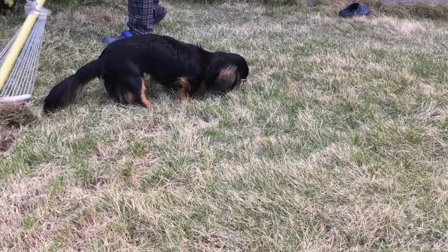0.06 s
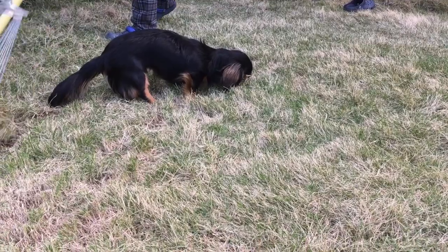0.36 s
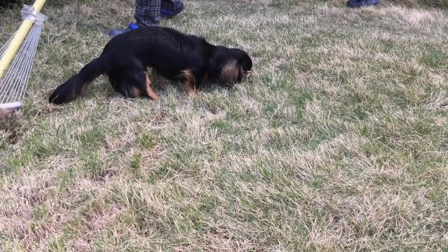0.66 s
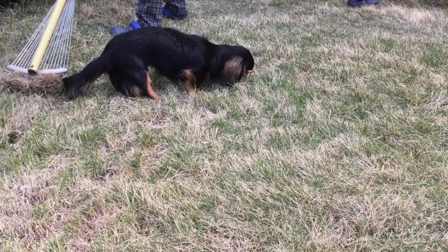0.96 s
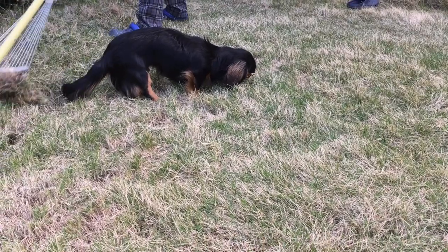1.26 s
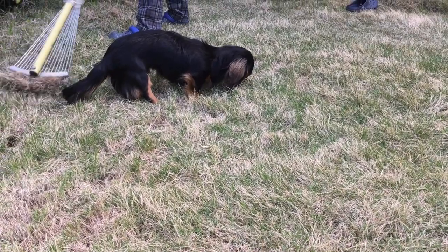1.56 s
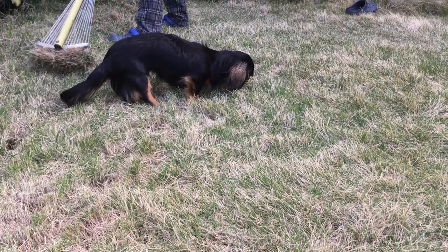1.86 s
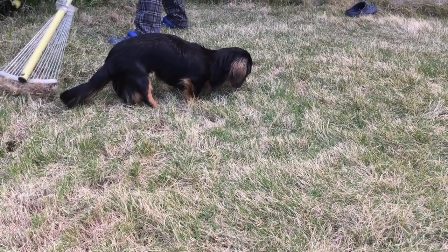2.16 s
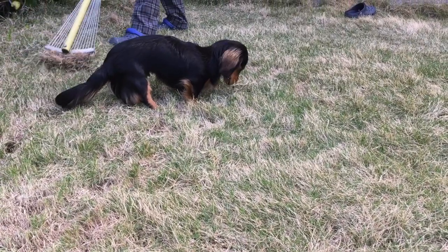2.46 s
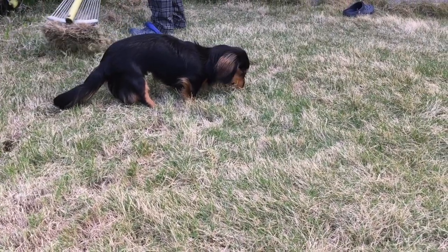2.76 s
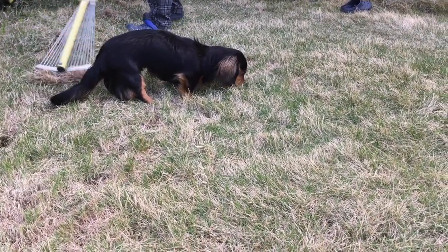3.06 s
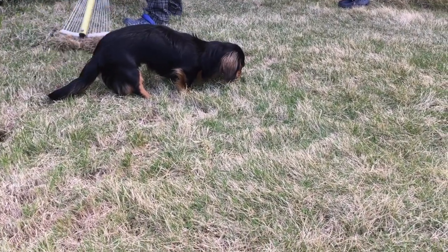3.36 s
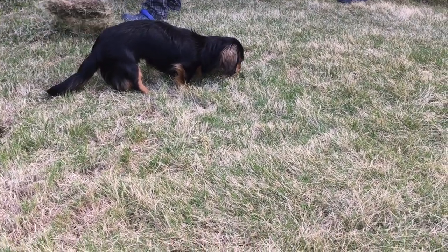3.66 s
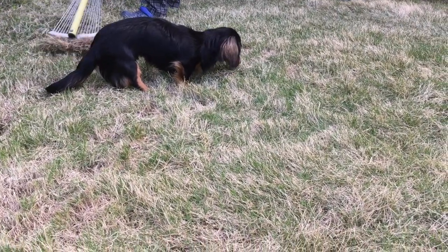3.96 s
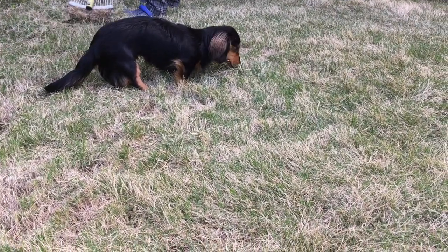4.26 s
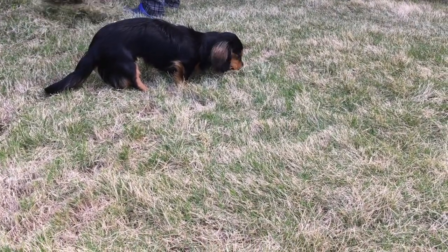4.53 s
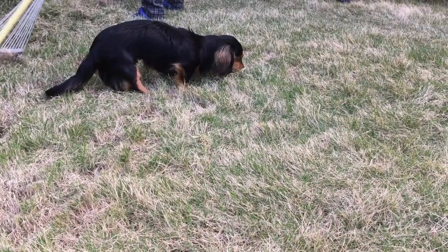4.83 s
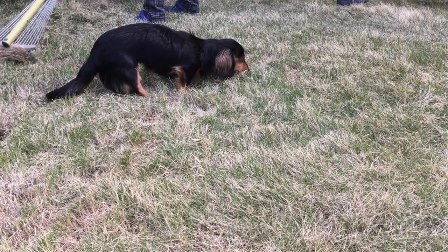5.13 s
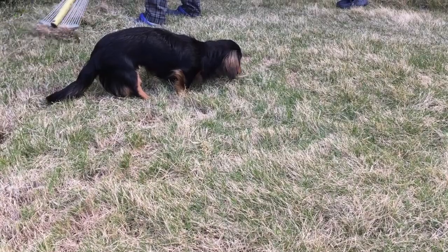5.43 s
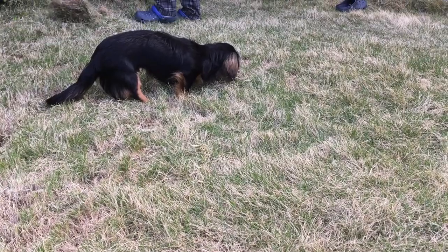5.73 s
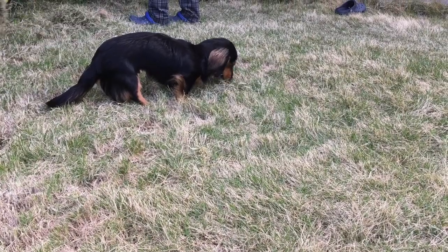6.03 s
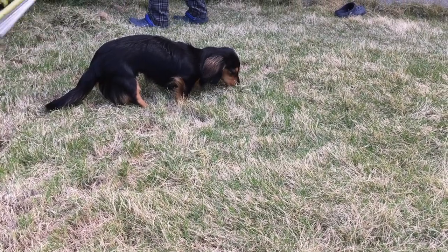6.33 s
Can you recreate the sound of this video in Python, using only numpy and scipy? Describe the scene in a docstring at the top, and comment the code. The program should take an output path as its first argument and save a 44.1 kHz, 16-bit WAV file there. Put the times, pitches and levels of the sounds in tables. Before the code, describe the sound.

A wire fan rake is pulled through a dry lawn about seven times, a few steps from the microphone. Each stroke is a crisp crackle of dead blades over a lower rasp, with tines snagging, snapping free and clattering with a light metallic ring. The sharpest stroke comes a little before the middle. A few soft thuds sound in the ground. The open garden echoes faintly, over a low hum like far traffic.

```python
"""A wire fan rake is pulled through a dry lawn in quick strokes, a few steps away.
Dead blades crackle under the tines, which snag, spring free and clatter; the turf rasps below.
Contacts ring the wire fan, harder knocks ring the head, and the ground thuds softly.
The garden echoes faintly, over a low rumble and hum like far traffic."""
import sys
import numpy as np
from scipy import signal
from scipy.fft import rfft, irfft
from scipy.io import wavfile
from scipy.ndimage import map_coordinates

SR = 44100
rng = np.random.default_rng(int(sys.argv[2]) if len(sys.argv) > 2 else 0)


def output_pcm(signal):
    """Save a mono or channel-first signal as 16-bit PCM at the path in sys.argv[1].

    Samples are clipped to [-1, 1] before scaling.
    """
    pcm = np.clip(np.atleast_2d(signal).T, -1, 1) * 32767
    wavfile.write(sys.argv[1], SR, np.round(pcm).astype(np.int16))


N = 281799
TIME_S = np.arange(N) / SR
CUTOFF_HZ = 15850

# Rake pulls. Each row: bite, hardest pull and lift in seconds, blade crackle in dB, turf rasp in dB,
# build-up in dB, easing off in dB.
PULLS = [(0.0, 0.03, 0.21, -46.5, -52.5, -6.5, 9.5), (0.618, 0.834, 1.06, -47, -53, 2.5, 6.5),
         (1.408, 1.674, 1.804, -49.5, -56, 8.5, 0), (2.206, 2.387, 2.634, -41, -48, 16.5, 16),
         (3.27, 3.33, 3.541, -48, -56.5, -1.5, 0.5), (3.954, 4.16, 4.39, -46, -53.5, 4.5, 10),
         (5.187, 5.345, 5.666, -42.5, -51, 7, 10), (6.345, 6.38, 6.35, -52.5, -63, 1, -4)]
# Fan brushing the grass as it lands or is flicked clear. Each row: peak in seconds, crackle in dB,
# rasp in dB, rise and fade in seconds.
BRUSH_CONTACTS = [(0.138, -42.5, -49.5, 0.0092, 0.035), (.176, -41, -52.5, .012, .018),
                  (.525, -45.5, -53, 0.022, 0.055), (1.40, -58.5, -68, 0.041, 0.022),
                  (2.19, -59.5, -67, 0.053, .02), (3.15, -53, -64.5, 0.027, .03),
                  (3.25, -55, -62, 0.033, .02), (4.366, -44, -53.5, 0.031, 0.023),
                  (4.944, -38.5, -48, 0.024, 0.025), (5.11, -54.5, -60, 0.026, 0.024),
                  (5.93, -69.5, -83, .08, 0.042), (6.259, -66, -94, 0.16, 0.034),
                  (6.285, -49, -59, 0.012, 0.016)]
# Tines snagging and springing free. Each row: peak in seconds, snap in dB, clatter in dB, fade in seconds.
TINE_SNAGS = [(0.0112, -30, -43, .012), (.0631, -34, -48, 0.0085), (0.108, -36, -58, 0.0054),
              (0.4594, -43, -57.5, .005), (0.4985, -35.5, -51, 0.0048), (0.5163, -33.5, -50, 0.0065),
              (0.6103, -40, -51.5, 0.0067), (0.65, -39, -51.5, 0.0057), (.844, -29.5, -44, 0.0078),
              (0.8832, -28.5, -38.5, 0.01), (.9354, -45, -57, .005), (1.022, -36.5, -58, 0.0044),
              (1.086, -44, -59, 0.015), (1.418, -33.5, -51.5, 0.0058), (1.4546, -46, -68, .005),
              (1.4737, -42.5, -59, 0.007), (1.534, -37.5, -51.5, 0.0044), (1.5895, -34.5, -54, 0.0077),
              (1.6366, -38, -49, 0.0064), (1.6684, -33.5, -46.5, 0.012), (1.762, -42, -59, 0.008),
              (1.858, -42, -57.5, 0.013), (2.2047, -39.5, -51, 0.0053), (2.234, -47, -65, 0.01),
              (2.289, -36, -46, .005), (2.3062, -35, -52, 0.011), (2.3305, -20.5, -50, 0.0031),
              (2.337, -30, -48, 0.0066), (2.343, -29.5, -48, 0.011), (2.3617, -31, -48, 0.0069),
              (2.3851, -32, -63, 0.013), (2.4066, -35, -52.5, 0.016), (2.515, -35.5, -53.5, 0.0094),
              (2.683, -40.5, -54.5, 0.012), (3.129, -48, -58, 0.0064), (3.138, -40, -61, .004),
              (3.162, -39.5, -53, 0.0085), (3.2546, -41, -54.5, 0.012), (3.298, -40, -52, .013),
              (3.483, -36.5, -54.5, 0.017), (3.526, -45, -53.5, 0.017), (3.801, -60, -73, 0.0078),
              (3.9373, -41, -63, 0.0073), (3.9496, -32.5, -49, .006), (3.9751, -41, -58, 0.013),
              (4.097, -27.5, -42.5, 0.0095), (4.163, -30.5, -47, .022), (4.284, -43, -68, .003),
              (4.921, -32, -43, 0.0037), (4.9362, -27.5, -42.5, 0.0088), (4.96, -35, -44, 0.0057),
              (5.189, -35, -48.5, 0.011), (5.258, -38, -53, .007), (5.3353, -33, -46, 0.012),
              (5.352, -31, -51, 0.011), (5.43, -36, -46, 0.013), (5.449, -37, -48, 0.0067),
              (5.651, -58, -73, 0.0029), (5.7088, -52, -60, 0.0061), (6.278, -35, -62, .007),
              (6.2946, -38.5, -58, 0.0063), (6.336, -43.5, -56, .012), (6.371, -45, -68, .01)]
# Edges in Hz of the bands in which stems of different thickness crackle.
STEM_EDGES_HZ = [1500, 2600, 4200, 6500, 9500, 12500]
# Dry grass spectrum. Each row: frequency in Hz, relative density in dB.
GRASS_SPECTRUM = [(150, -14), (350, -13.5), (600, -16.5), (950, -14.5), (1350, -16.5), (1900, -14.5),
                  (3000, -9.5), (4400, -11), (4950, -14), (5600, -5.5), (7400, -9), (9700, -3.5),
                  (10400, -6), (11900, 1)]
# Wire fan modes. Each row: frequency in Hz, relative level in dB, T60 in seconds.
FAN_MODES = [(974, -45, .06), (1745, -16, 0.13), (2144, -1, 0.13), (2610, -11, 0.054), (2910, -9, 0.067),
             (3300, -3, 0.065), (3627, -3.5, 0.03), (4530, -0.5, 0.032), (5520, -7, 0.047),
             (5800, -10, 0.062), (7700, -1.5, 0.15), (9550, 5.5, 0.12), (11340, 9.5, 0.06),
             (12900, 0, 0.11), (13700, -1, .1), (15000, 3, 0.11), (15200, 6, 0.072)]
# Knocks on the head. Each row: time in seconds, level in dB, favoured pitch in Hz.
HEAD_KNOCKS = [(0.883, -51, 2420), (0.951, -68, 2900), (1.02, -61.5, 3000), (1.416, -61.5, 1040),
               (2.334, -41.5, 1760), (2.348, -52, 2520), (4.921, -55, 1040), (5.11, -62.5, 2100),
               (5.188, -58, 2120), (6.276, -63, 1030), (6.28, -59.5, 2160)]
# Rake head modes. Each row: frequency in Hz, relative level in dB, T60 in seconds.
HEAD_MODES = [(1033, -2, 0.24), (1794, -4, 0.13), (2190, 1.5, 0.19), (2710, 6, 0.15), (2950, -5.5, 0.27)]
# Soft thuds in the ground. Each row: time in seconds, pitch in Hz, level in dB.
GROUND_BUMPS = [(.12, 130, -54.5), (.56, 124, -53.5), (5.944, 157, -55), (6.26, 252, -60), (6.3, 94.5, -53)]
# Returns from fences and walls. Each row: delay in seconds, gain in dB.
GARDEN_ECHOES = [(.0045, -20), (.021, -20), (0.045, -22.5)]
# Outdoor air spectrum. Each row: frequency in Hz, relative density in dB.
AIR_SPECTRUM = [(22, -9), (35, -2.5), (55, 1.5), (85, -1), (115, -9), (170, -13), (260, -24), (500, -27.5),
                (1000, -28.5), (2200, -35.5), (5000, -46.5), (8000, -44), (15000, -37.5)]
# Far rumble envelope. Each row: time in seconds, level in dB.
RUMBLE_ENVELOPE = [(0, -68.5), (.8, -66), (2.0, -72), (4.2, -76), (5.4, -69), (6.39, -69.5)]
# Far engine notes. Each row: frequency in Hz, relative level in dB, wander as a share of the pitch.
HUM_NOTES = [(53.3, 0, .012), (85.1, -5.5, 0.01364), (360.5, -24.5, 0.0067)]
# Hum envelope. Each row: time in seconds, level in dB.
HUM_ENVELOPE = [(0, -58.5), (2.0, -59), (3.1, -62), (3.5, -61.5), (3.67, -56.5), (3.9, -60), (4.9, -57.5),
                (5.7, -63), (6.39, -58)]


def rake():
    """Contacts sound through the grass and ring the fan; knocks ring the head."""
    contacts = stem_flicker(drag() + snags(), depth_db=1.82, rate_hz=24.5)
    return colour(contacts, GRASS_SPECTRUM) + from_db(-27) * wire_fan(contacts) + head_knocks()


def drag():
    """Blades break crisply; the tines rasp lower down through the thatch."""
    crackle, rasp = pull_envelopes()
    tearing = tufts(per_s=170, spread_db=1.5, fade_s=0.003, steady=0.9)
    catching = catches(per_s=40, spread_db=1, fade_s=0.01, steady=3.2)
    blades = cut(cracks(per_s=4000, spread_db=0), 4200, "high") * crackle * from_db(0.17)
    thatch = cut(cracks(per_s=4000, spread_db=1.5), 5170, "low") * rasp * from_db(12)
    return (blades + thatch) * tearing * catching


def pull_envelopes(bite_db_per_s=440, lift_db_per_s=348, shed_db=-73, shed_db_per_s=22):
    """Crackle and rasp amplitudes: each pull bites, builds, eases and lifts; brushes add short swells."""
    crackle_power, rasp_power = np.zeros((2, N))
    for bite_s, hardest_s, lift_s, crackle_db, rasp_db, build_db, ease_db in PULLS:
        before_s = np.maximum(bite_s - TIME_S, 0)
        after_s = np.maximum(TIME_S - lift_s, 0)
        force_db = np.interp(TIME_S, [bite_s, hardest_s, lift_s], [-build_db, 0, -ease_db])
        force_db -= bite_db_per_s * before_s + lift_db_per_s * after_s
        shed = from_db(shed_db - shed_db_per_s * after_s) * (after_s > 0)  # grass off the lifted tines
        crackle_power += from_db(crackle_db + force_db) ** 2 + shed ** 2
        rasp_power += from_db(rasp_db + force_db) ** 2
    for peak_s, crackle_db, rasp_db, rise_s, fade_s in BRUSH_CONTACTS:
        span, shape = swell(peak_s, rise_s, fade_s)
        crackle_power[span] += (from_db(crackle_db) * shape) ** 2
        rasp_power[span] += (from_db(rasp_db) * shape) ** 2
    return np.sqrt(crackle_power), np.sqrt(rasp_power)


def cracks(per_s, spread_db):
    """Random tiny fractures, many small and a few large; unit power."""
    sizes = from_db(spread_db * np.minimum(rng.exponential(1, N), 4))
    signs = rng.choice([-1, 1], N)
    return unit_rms(sizes * signs * (rng.random(N) < per_s / SR))


def tufts(per_s, spread_db, fade_s, steady):
    """Tufts give way in turn: the gain jumps and decays; unit power."""
    tears = cracks(per_s, spread_db) ** 2
    pole = np.exp(-1 / (fade_s * SR))
    power = signal.lfilter([1 - pole], [1, -pole], tears + 1e-18)
    return unit_rms(np.sqrt(steady + power))


def catches(per_s, spread_db, fade_s, steady):
    """Tines catch at uneven intervals, briefly lifting the gain; unit power."""
    gaps, sizes = rng.random((600, 2)).T
    onsets = (np.cumsum(0.4 + 1.2 * gaps) / per_s * SR).astype(int)
    inside = onsets < N
    kicks = np.zeros(N)
    kicks[onsets[inside]] = from_db(spread_db * sizes[inside]) ** 2
    pole = np.exp(-1 / (fade_s * SR))
    power = signal.lfilter([1], [1, -pole], kicks + 1e-18)
    return unit_rms(np.sqrt(steady + power / power.mean()))


def snags(rise_share=0.26, clatter_stretch=1.83):
    """Bursts of breaking stems, with a longer clatter of wires knocking together."""
    snap_power, clatter_power = np.zeros((2, N))
    for peak_s, snap_db, clatter_db, fade_s in TINE_SNAGS:
        rise_s = rise_share * fade_s
        span, shape = swell(peak_s, rise_s, fade_s)
        snap_power[span] += (from_db(snap_db) * shape) ** 2
        span, shape = swell(peak_s, rise_s, fade_s * clatter_stretch)
        clatter_power[span] += (from_db(clatter_db) * shape) ** 2
    stems = from_db(-3) * cut(np.sqrt(snap_power) * cracks(per_s=11000, spread_db=1.5), 3800, "high")
    # Scales with power: the hardest snaps are the brightest.
    edge = from_db(19) * cut(snap_power * rng.standard_normal(N), 10500, "high")
    clatter = np.sqrt(clatter_power) * cracks(per_s=8300, spread_db=-1)
    wires = from_db(11.5) * cut(cut(clatter, 6300, "low"), 1300, "high")
    return stems + edge + wires


def stem_flicker(x, depth_db, rate_hz):
    """Colour shifts from tuft to tuft: each band flickers on its own."""
    lows = [signal.sosfiltfilt(signal.butter(2, hz, fs=SR, output="sos"), x) for hz in STEM_EDGES_HZ]
    bands = np.diff([np.zeros(N), *lows, x], axis=0)
    return sum(band * unit_rms(from_db(depth_db * drift(rate_hz))) for band in bands)


def wire_fan(contacts, lag_s=0.001, flex_s=0.00013):
    """The tines ring; they bend under the pull, so their pitches waver."""
    ringing = sum(from_db(db) * ring(contacts, hz, t60_s) for hz, db, t60_s in FAN_MODES)
    flexed_time_s = TIME_S - lag_s + flex_s * drift(rate_hz=6.8)
    return map_coordinates(ringing, [flexed_time_s * SR], order=3)


def head_knocks(falloff_db_per_octave=34):
    """Each knock rings all head modes, favouring those near its own pitch."""
    rings = []
    for time_s, knock_db, favoured_hz in HEAD_KNOCKS:
        for hz, mode_db, t60_s in HEAD_MODES:
            db = knock_db + mode_db - falloff_db_per_octave * abs(np.log2(hz / favoured_hz))
            rings.append((time_s, hz, db, t60_s / np.log(1000)))
    return blows(rings, width_share=0.078)


def ground_bumps(fade_s=0.077):
    """Dull thuds, like steps on the lawn."""
    return blows([(time_s, hz, db, fade_s) for time_s, hz, db in GROUND_BUMPS], width_share=0.13)


def blows(rows, width_share):
    """Each blow rings a cluster of close modes: a decaying noise band around its pitch."""
    out = np.zeros(N)
    for time_s, hz, db, fade_s in rows:
        band_hz = [hz / (1 + width_share), hz * (1 + width_share)]
        cluster = unit_rms(cut(rng.standard_normal(SR), band_hz, "band"))
        span, shape = swell(time_s, 1 / hz, fade_s)
        out[span] += from_db(db) * cluster[-len(shape):] * shape
    return out


def garden(x, t60_s, tail_db):
    """Dull echoes from fences and walls, plus a thin scattered tail."""
    dull = cut(x, 12000, "low", order=1)
    echoes = sum(from_db(db) * np.interp(TIME_S - delay_s, TIME_S, dull, left=0)
                 for delay_s, db in GARDEN_ECHOES)
    scatter = rng.standard_normal(SR) * from_db(-60 * TIME_S[:SR] / t60_s)
    tail = signal.fftconvolve(dull, scatter / np.linalg.norm(scatter))[:N]
    return echoes + from_db(tail_db) * tail


def background():
    """Steady outdoor air, a swelling far rumble and the hum."""
    air = from_db(-57.5) * colour(rng.standard_normal(N), AIR_SPECTRUM)
    rumble_db = np.interp(TIME_S, *np.transpose(RUMBLE_ENVELOPE))
    rumble = from_db(rumble_db) * unit_rms(cut(rng.standard_normal(N), [95, 210], "band"))
    return air + rumble + engine_hum()


def engine_hum(waver_db=2):
    """Two low engine notes and a faint whine, each wandering in level and pitch."""
    level_db = np.interp(TIME_S, *np.transpose(HUM_ENVELOPE))
    out = np.zeros(N)
    for hz, note_db, wander_share in HUM_NOTES:
        rms = from_db(level_db + note_db + waver_db * drift(rate_hz=6.4))
        pitch_hz = hz * (1 + wander_share * drift(rate_hz=3))
        out += rms * np.sqrt(2) * np.sin(2 * np.pi * np.cumsum(pitch_hz) / SR)
    return out


def swell(peak_s, rise_s, fade_s):
    """Up to 0.5 s of exponential rise and fade, 1 at the peak; returns slice and shape."""
    start = max(int((peak_s - 0.08) * SR), 0)
    span = slice(start, start + SR // 2)
    t_s = TIME_S[span] - peak_s
    exponent = np.minimum(t_s / rise_s, -t_s / fade_s)
    return span, np.exp(np.maximum(exponent, -30))


def ring(x, hz, t60_s):
    """One mode; unit power gain for white noise."""
    radius = from_db(-60 / (t60_s * SR))
    angle = 2 * np.pi * hz / SR
    gain = np.sin(angle) * np.sqrt(2 * (1 - radius ** 2))
    return signal.lfilter([0, gain], [1, -2 * radius * np.cos(angle), radius ** 2], x + 1e-18)


def colour(x, spectrum, size=8192):
    """Minimum-phase filter of the given shape; white noise keeps its audible power."""
    hz, db = np.transpose(spectrum)
    grid_hz = np.maximum(np.fft.rfftfreq(size, 1 / SR), 1)
    gain = from_db(np.interp(np.log(grid_hz), np.log(hz), db))
    gain /= np.sqrt(np.mean(gain ** 2 * (grid_hz < CUTOFF_HZ)))
    cepstrum = irfft(np.log(gain))
    cepstrum[1:size // 2] *= 2  # fold onto the causal half
    cepstrum[size // 2 + 1:] = 0
    impulse = irfft(np.exp(rfft(cepstrum)))
    return signal.fftconvolve(x, impulse)[:N]


def drift(rate_hz, hop=40, settle=2000):
    """Smooth random wander; unit RMS."""
    pole = np.exp(-2 * np.pi * rate_hz * hop / SR)
    noise = rng.standard_normal(N // hop + settle + 2)
    slow = signal.lfilter([1], [1, -2 * pole, pole ** 2], noise)[settle:]
    return np.interp(np.arange(N) / hop, np.arange(len(slow)), unit_rms(slow))


def cut(x, hz, kind, order=2):
    """Butterworth filter."""
    return signal.sosfilt(signal.butter(order, hz, kind, fs=SR, output="sos"), x)


def from_db(db):
    """Decibels to gain."""
    return 10 ** (np.asarray(db) / 20)


def unit_rms(x):
    """Scale to unit power."""
    return x / np.sqrt(np.mean(x ** 2) + 1e-20)


def scene():
    """The rake in the open garden; mono."""
    raking = rake()
    return (raking + garden(raking, t60_s=0.92, tail_db=-20.5) + ground_bumps() + background())[None]


def record(dry):
    """The microphone drops the deepest bass; the top is cut steeply."""
    thinned = cut(dry, 20, "high")
    return signal.sosfilt(signal.ellip(12, 0.2, 70, CUTOFF_HZ, fs=SR, output="sos"), thinned)


dry = scene()
out = record(dry)
output_pcm(out)
```